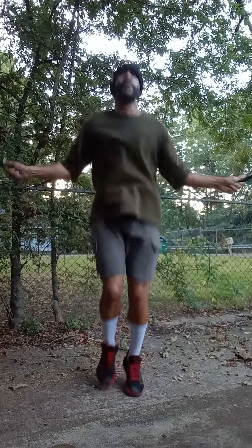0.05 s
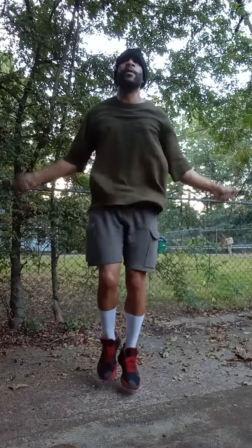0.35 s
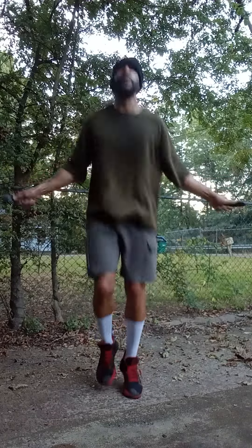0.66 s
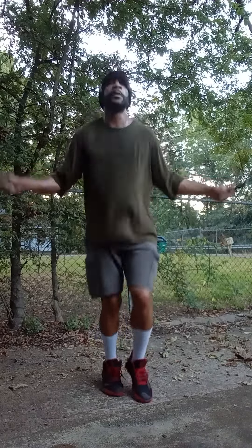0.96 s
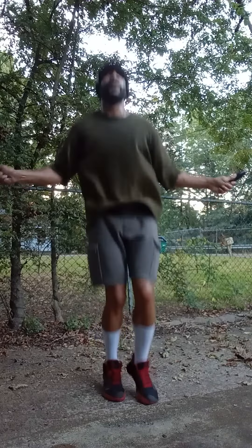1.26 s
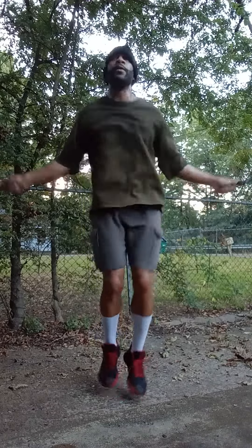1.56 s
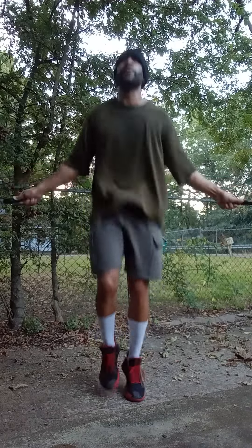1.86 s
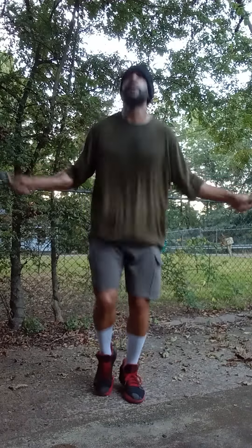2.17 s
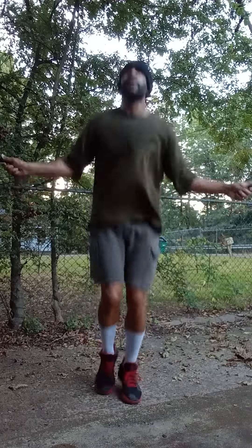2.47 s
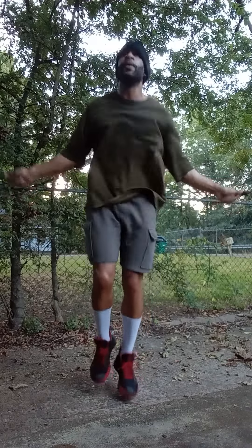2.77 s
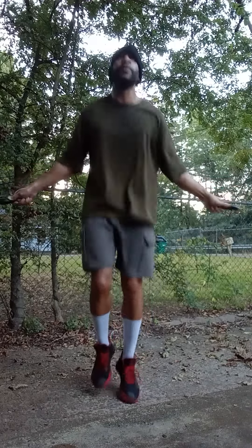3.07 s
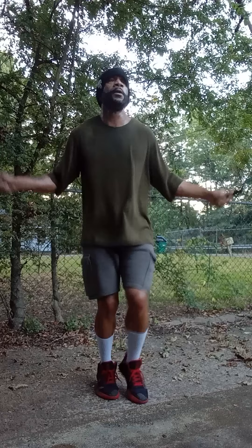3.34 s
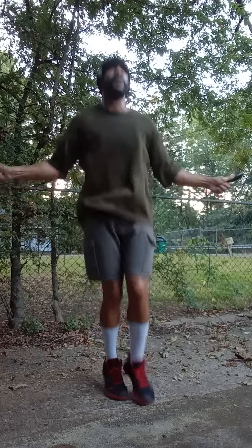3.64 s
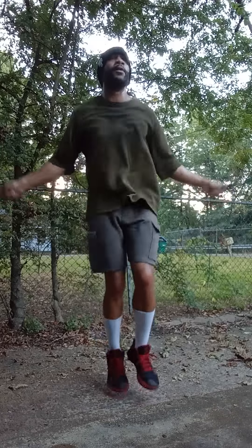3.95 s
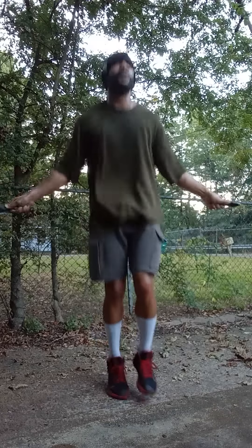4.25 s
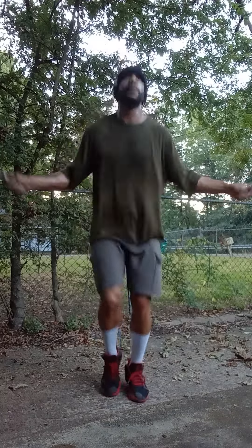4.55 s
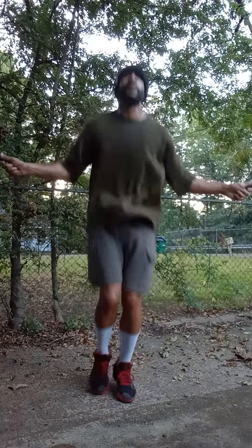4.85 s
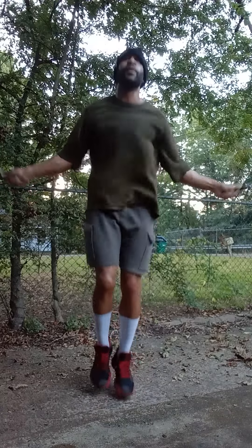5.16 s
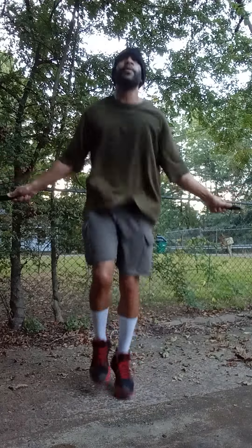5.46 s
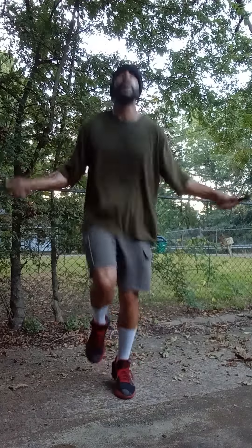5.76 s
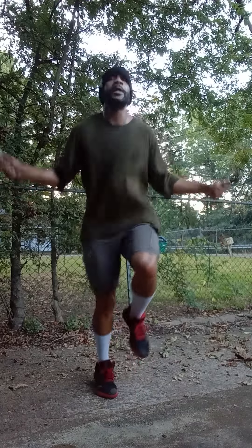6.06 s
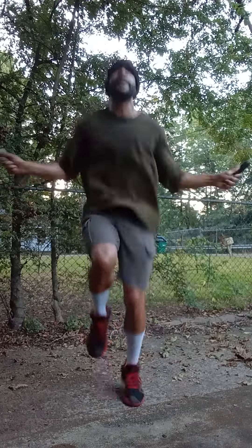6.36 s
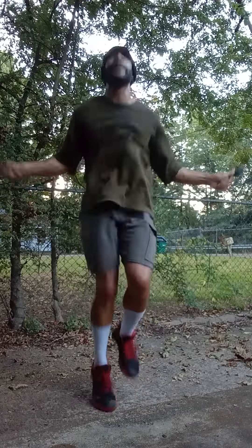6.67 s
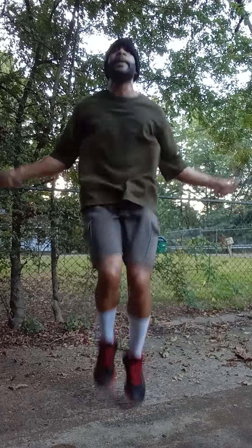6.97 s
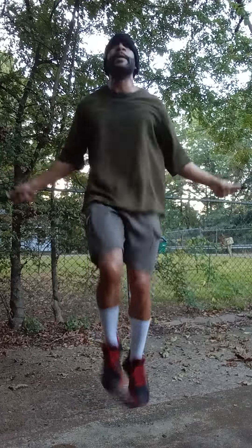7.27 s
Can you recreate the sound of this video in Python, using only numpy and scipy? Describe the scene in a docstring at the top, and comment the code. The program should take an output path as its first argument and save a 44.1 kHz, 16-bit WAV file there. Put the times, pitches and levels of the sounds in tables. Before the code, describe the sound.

A thin jump rope turns steadily on outdoor pavement, each pass giving a swish and a short whoop, then a sharp crack on the ground. Trainers land softly between the slaps, sometimes scuffing grit. Near the end the turns get faster and the whistling louder. A faint rumble and a few tiny, high bird chirps lie behind, and the rope sounds nearby, slightly to the right.

```python
"""Skipping rope among trees

Someone skips with a thin rope on a paved patch, speeding up for the last turns. The rope whistles by
vortex shedding, whoops each time it sweeps past, then cracks on the pavement. Trainers land softly
between the slaps, over a faint outdoor rumble and a few high bird chirps."""
import sys
import numpy as np
from scipy import signal
from scipy.fft import rfft, irfft, next_fast_len
from scipy.io import wavfile
from scipy.ndimage import uniform_filter1d

SR = 44100
rng = np.random.default_rng(int(sys.argv[2]) if len(sys.argv) > 2 else 0)


def generate_wav(signal):
    """Clip the signal to [-1, 1] and save it as 16-bit WAV at the path in sys.argv[1]."""
    frames = np.transpose(np.atleast_2d(signal))
    scaled = np.clip(frames, -1, 1) * 32767
    pcm = np.round(scaled).astype(np.int16)
    wavfile.write(sys.argv[1], SR, pcm)


N = 327222
T = np.arange(N) / SR
LEFT_LAG_S = 0.000125   # extra travel time to the left microphone

# One row per turn, timed as the rope sweeps past in front; the last two shape the whistle overhead:
# time_s, whoop_hz, whoop_db, whoop_width_s, swish_db, sag_hz, overhead_db
TURNS = [(-0.03, 800, -43, 0.017, -61, 60.4, -1), (0.368, 780, -33.5, 0.009, -53, 39.4, -6.5),
         (0.77, 838, -43.5, 0.0053, -51, 55.05, 3), (1.167, 839, -44, 0.01, -55, 70.1, 2),
         (1.561, 830, -36, 0.0094, -50.5, 50.2, -2.5), (1.955, 801, -37.5, .0094, -51, 45.15, -9),
         (2.356, 841, -36.5, 0.0085, -53, 59.8, -3.5), (2.758, 825, -43.5, .015, -52, 105.4, -2.5),
         (3.176, 793, -42.5, 0.0094, -51.5, 75.7, -2), (3.577, 838, -44.5, .016, -53.5, 54.16, 7),
         (3.965, 846, -41.5, 0.0083, -53.5, 35.17, -5.5), (4.356, 859, -33, 0.011, -48, 44.43, -7),
         (4.756, 804, -40, 0.015, -52, 39.53, 0.5), (5.151, 798, -45, 0.018, -52.5, 49.5, -6),
         (5.541, 816, -36, 0.01, -49, 61, -1), (5.925, 866, -40, 0.016, -45.5, 84.2, -2.5),
         (6.28, 961, -31, 0.0078, -42, 75.07, -2), (6.627, 878, -36, .014, -40, 115.1, -6),
         (6.978, 893, -39.5, 0.013, -41.5, 79.6, -2.5), (7.335, 883, -25, .0057, -40, 79.5, 6)]


def from_db(db):
    """Decibels to amplitude ratio."""
    return 10 ** (np.asarray(db) / 20)


def rms_one(x):
    """Normalisation to unit rms."""
    return x / np.sqrt(np.mean(np.abs(x) ** 2) + 1e-20)


def gains(points, size):
    """Magnitude response on the FFT grid, from rows of frequency_hz, gain_db."""
    hz, db = np.transpose(points)
    return from_db(np.interp(np.log(np.fft.rfftfreq(size, 1 / SR) + 1), np.log(hz), db))


def colour(x, points):
    """Zero-phase filtering gives a sound a spectrum."""
    size = next_fast_len(N)
    return irfft(rfft(x, size) * gains(points, size), size)[..., :N]


def noise(points, coherence, lag_s=0):
    """Partly coherent stereo noise with a given spectrum and a lag on the left; rms 1."""
    mid, side = rng.standard_normal((2, N))
    left, right = np.sqrt(1 + coherence) * mid + np.sqrt(1 - coherence) * side * [[1], [-1]]
    return rms_one(colour(np.array([np.roll(left, round(lag_s * SR)), right]), points))


def patchy(x, spread_db, size=1024):
    """Random modulation in time and frequency: a hiss flickers in short, narrow patches; rms 1."""
    cells = signal.stft(x, nperseg=size)[2]
    chance = uniform_filter1d(rng.standard_normal(cells.shape[1:]), size=4, axis=0)
    chance = rms_one(uniform_filter1d(chance, size=5, axis=1))
    return rms_one(signal.istft(cells * from_db(spread_db * chance), nperseg=size)[1][:, :N])


def strike(force, points, size=1024):
    """Convolution of contact forces with a causal (minimum-phase) impulse response of peak 1."""
    cepstrum = irfft(np.log(gains(points, size)))
    cepstrum[1:size // 2] *= 2
    cepstrum[size // 2 + 1:] = 0
    response = irfft(np.exp(rfft(cepstrum)))
    return signal.oaconvolve(force, response[None] / np.abs(response).max(), axes=1)[:, :N]


def flutter(width_hz):
    """Complex envelope of narrow-band noise: slowly varying amplitude and phase; rms 1."""
    white = rng.standard_normal(N + SR) + 1j * rng.standard_normal(N + SR)
    return rms_one(signal.sosfilt(signal.butter(2, width_hz, fs=SR, output="sos"), white)[SR:])


def narrow_band(pitch, width_hz, spread, left_lag_rad=0):
    """Narrow-band noise round a moving pitch; spread lowers the coherence of left and right; rms 1."""
    shared = flutter(width_hz)
    pair = np.array([shared * np.exp(-1j * lag) + spread * flutter(width_hz)
                     for lag in (left_lag_rad, 0)])
    return rms_one((pair * np.exp(2j * np.pi * np.cumsum(pitch) / SR)).real)


def later(x, delay_s):
    """Fractional delay by linear interpolation."""
    return np.interp(T - delay_s, T, x, left=0)


def from_right(x):
    """Path difference: direct sound reaches the left microphone a little later."""
    return np.array([np.roll(x, round(LEFT_LAG_S * SR)), x])


def clicks(times, db):
    """An impulse train, one impulse per event."""
    out = np.zeros(N)
    out[np.clip(np.round(times * SR).astype(int), 0, N - 1)] = from_db(db)
    return out


def dying(hits, t60_s):
    """Exponential decay: an envelope that jumps at each impulse and falls 60 dB in t60_s."""
    return signal.lfilter([1], [1, -from_db(-60 / (t60_s * SR))], hits + 1e-18)


def swells(times, db, widths):
    """A sum of Gaussian envelopes, one per event; widths are standard deviations in seconds."""
    return sum(from_db(peak) * np.exp(-.5 * np.minimum(((T - centre) / width) ** 2, 100))
               for centre, peak, width in zip(times, db, widths))


def nearest_event(times):
    """For each sample, the row of the closest event."""
    return np.searchsorted((times[1:] + times[:-1]) / 2, T)


def outdoors():
    """Ambient noise: a coherent distant rumble under a diffuse hiss of air and leaves."""
    # Spectra of the rumble and of the hiss: frequency_hz, density_db
    rumble_spectrum = [(15, -54.5), (25, -36.5), (42, -30), (62, -6.5), (80, -5), (100, 0.5), (130, 1.5),
                       (170, -7), (300, -11.5), (600, -16.5), (1500, -25), (5000, -84.5)]
    air_spectrum = [(15, -49), (25, 0.5), (108, -13.5), (270, -17.5), (575, -19.5), (677, -6), (775, -8.5),
                    (1040, -11), (1560, -12), (2610, -21), (5730, -24.5), (8360, -37.5), (13600, -44.5),
                    (14800, -31.5), (16000, -45)]
    # Slow drift of the rumble: time_s, level_db
    rumble_level = [(0.0, -60.5), (1.25, -59), (1.8, -60.5), (3.6, -59.5), (4.1, -61), (6.7, -60.5),
                    (7.42, -59)]
    drift = from_db(np.interp(T, *np.transpose(rumble_level)))
    rumble = drift * patchy(noise(rumble_spectrum, coherence=1.0), spread_db=3.5, size=2048)
    leaves = patchy(noise(air_spectrum, coherence=0.097), spread_db=5.0)
    return rumble + from_db(-67.0) * colour(leaves, [(20, -12), (120, 0.5)])


def bird():
    """Thin falling notes, blurred by scattering in the leaves and followed by one echo."""
    # Notes of a small bird: time_s, start_hz, end_hz, level_db, width_s
    chirps = [(3.006, 7900, 6970, -71.5, 0.016), (3.142, 7000, 6200, -69, 0.016),
              (5.336, 7900, 6920, -73.5, 0.037), (5.458, 7200, 6170, -63, 0.016)]
    time_s, start_hz, end_hz, level_db, width_s = np.transpose(chirps)
    row = nearest_event(time_s)
    fallen = np.clip((T - time_s[row]) / width_s[row] / 2 + 0.81, 0, 1)
    pitch = start_hz[row] + fallen * (end_hz - start_hz)[row]
    notes = swells(time_s, level_db, width_s) * narrow_band(pitch, width_hz=170, spread=1.0)
    return notes + from_db(-4.5) * np.array([later(x, 0.024) for x in notes[::-1]])


def shoes():
    """Impact and friction: rubber soles tap and roll down, the weight thuds, and grit scuffs."""
    # Landings: start_s, tap_db, thud_db, hardness_db
    steps = [(0.178, -67, -55.5, 1), (0.469, -48.5, -67, 0), (0.9305, -47.5, -60, 8.5),
             (0.983, -43.5, -57, -3), (1.3274, -38, -53, 8), (1.356, -43.5, -50, 3), (1.49, -48, -84, -4),
             (1.756, -74, -63, -12), (2.146, -48, -62, -32.5), (2.58, -75, -62, -10), (2.917, -50, -64, -5),
             (2.965, -65, -60, -11), (3.316, -53, -70, -1), (3.365, -46, -53, -25), (3.7498, -46, -54.5, 7),
             (4.111, -49, -69, 5.5), (4.151, -59, -53, -18), (4.552, -45, -66, -15), (4.932, -81, -59, -16),
             (5.289, -48.5, -59, -15), (6.062, -54, -55.5, -4), (6.752, -66, -68, -10),
             (7.102, -48, -65, 2)]
    # Soles sliding on grit: time_s, level_db, width_s
    scuffs = [(0.995, -60, 0.025), (2.178, -61.5, 0.031), (2.622, -61.5, 0.014), (3.375, -59.5, 0.037),
              (3.76, -64.5, 0.013), (4.153, -75, 0.0068), (4.585, -60, 0.037), (5.77, -60, 0.036),
              (6.533, -46.5, 0.002), (6.543, -43, 0.0023), (6.557, -49, 0.0086), (6.763, -62, 0.036),
              (6.865, -58.5, 0.046)]
    # Spectra of the sole's tap and of the weight's thud: frequency_hz, density_db
    tap_spectrum = [(150, -16), (450, 3.5), (650, 6), (900, 1.5), (1250, 8), (1600, 9), (2100, -13),
                    (5000, -12.5), (12000, -50)]
    thud_spectrum = [(40, -20), (110, -1), (280, 5.5), (450, 1), (650, -9), (1000, -50), (4000, -62)]
    start_s, tap_db, thud_db, hardness_db = np.transpose(steps)
    knock = strike(from_right(clicks(start_s, tap_db + hardness_db)), tap_spectrum)
    contact_s = 0.01 * from_db(-.65 * hardness_db)   # a softer contact lasts longer
    rolling = swells(start_s + 0.011, tap_db - 10.5 + 0.25 * hardness_db, contact_s)
    roll = rolling * noise(tap_spectrum, coherence=0.47)
    weight = uniform_filter1d(dying(clicks(start_s + 0.0045, thud_db), t60_s=0.14), size=660)
    thud = from_db(5.5) * weight * noise(thud_spectrum, coherence=0.99)
    grit_spectrum = [(500, -4), (1600, 7.5), (3000, 8), (6500, -1.0), (8500, -24.5), (16000, -25)]
    grit = patchy(noise(grit_spectrum, coherence=0.11), spread_db=6.0)
    return knock + roll + thud + swells(*np.transpose(scuffs)) * grit


def swing():
    """The whistle's pitch (Hz) and level (dB) follow rope speed, which sags overhead in every turn."""
    # The skipper's pace, steady and then faster: time_s, pitch_hz, level_db
    pace = [(0.0, 810, -55.5), (5.7, 813.6, -59), (5.97, 921, -43), (7.42, 914.5, -43)]
    # The whistle round one turn, dipping after the slap: turn_fraction, gain_db
    turn_loudness = [(0.03, 6.5), (0.15, 1), (0.25, -8.5), (0.41, 3), (0.7, -1), (0.85, -5.5)]
    time_s, *_, sag_hz, overhead_db = np.transpose(TURNS)
    starts = np.append(time_s, 2 * time_s[-1] - time_s[-2])
    turned = np.interp(T, starts, np.arange(len(starts)))
    row, fraction = turned.astype(int), turned % 1
    overhead = np.exp(-.5 * ((fraction - .68) / .15) ** 2)   # slowest 68% of the way round
    pace_s, pace_hz, pace_db = np.transpose(pace)
    pitch = np.interp(T, pace_s, pace_hz) - sag_hz[row] * overhead
    turn_db = np.interp(fraction, *np.transpose(turn_loudness), period=1)
    return pitch, np.interp(T, pace_s, pace_db) + turn_db + overhead_db[row] * overhead


def rush(pitch, level_db):
    """Turbulence round the rope: a rising swish as it comes over, and a hiss that grows with speed."""
    # Spectrum of the turbulent hiss: frequency_hz, density_db
    hiss_spectrum = [(300, -22), (600, -12.5), (1150, 4.5), (1700, 7), (2200, -5), (2700, 1), (3300, -3),
                     (6800, -9.5), (8500, -24.5), (13000, -25.5), (15000, -15.5), (16500, -34)]
    time_s, whoop_hz, _, width_s, swish_db, *_ = np.transpose(TURNS)
    row = nearest_event(time_s)
    swish_s = time_s - 0.034   # the swish peaks ahead of the whoop
    rising_hz = whoop_hz[row] * (2.25 + 0.67 * np.tanh((T - swish_s[row] - .005) / 0.0503))
    peak_db = swish_db - 14.5 + 0.64 * (swish_db + 50.0)
    band = narrow_band(rising_hz, width_hz=160, spread=0.73, left_lag_rad=2.4)
    swish = swells(swish_s, peak_db, width_s + 0.021) * band
    passing = swells(time_s - .005, swish_db - 6.5, width_s + 0.013)
    turning = from_db(level_db - 22 + 27 * np.log10(pitch / 850))
    hiss = patchy(noise(hiss_spectrum, coherence=0.14, lag_s=LEFT_LAG_S), spread_db=5.5)
    return swish + np.hypot(passing, turning) * hiss


def whistle(pitch, level_db):
    """Aeolian tone: vortex shedding at a rate set by speed, with a weaker drag tone an octave up."""
    lift = narrow_band(pitch, width_hz=35.7, spread=0.58, left_lag_rad=0.17)
    drag = from_db(-22) * narrow_band(2 * pitch, width_hz=86, spread=0.41, left_lag_rad=2.06)
    flapping = rms_one(from_db(3.5 * flutter(22).real))
    return from_db(level_db) * flapping * (lift + drag)


def whoops():
    """Superposition: the passing rope's whole arc sounds together in a burst with a third harmonic."""
    time_s, whoop_hz, whoop_db, width_s, *_ = np.transpose(TURNS)
    row = nearest_event(time_s)
    pitch = whoop_hz[row] - 45 * np.tanh((T - time_s[row]) / 0.03)   # falls as the rope goes by
    phase = 2 * np.pi * np.cumsum(pitch) / SR
    rough = np.clip(width_s[row] / 0.018, 0, 1)   # slow sweeps are the ragged ones
    waver = np.sqrt(1 - rough ** 2) + rough * flutter(46.7)
    burst = swells(time_s, whoop_db, width_s)
    tone = burst * (waver * np.exp(1j * phase)).real
    direct = from_db([[6], [7.5]]) * np.array([later(tone, .00003), tone])   # louder on the right
    echo_s = .0125 + rng.uniform(0, 0.00232, 2)   # reflection from nearby trunks
    echo = from_db(-5) * np.array([later(tone, delay) for delay in echo_s])
    third = narrow_band(3 * pitch, width_hz=120, spread=.6, left_lag_rad=1.2)
    return direct + echo + from_db(-25) * (pitch / 850) ** 6 * burst * third


def slaps():
    """Impact and reverberation: the rope cracks and lies down on grit; fence and trees scatter it."""
    # The rope hits the pavement: start_s, level_db, extra_body_db, extra_top_db
    impacts = [(0.0372, -22, -4, 0), (0.8374, -26, -1, 0), (1.2322, -22, 1, -2), (1.6384, -30, -9, -3),
               (2.0304, -30, 0, 5), (2.4267, -22, -2, -1), (2.8287, -22, -2, 0), (3.2398, -23, -2, 0),
               (3.6395, -31, 0, 3), (4.0345, -28, 2, 0), (4.4222, -22, -1, 0), (4.8237, -25, 3, 1),
               (5.2193, -22, -1, -5), (5.6086, -22, 2, 0), (5.9972, -25, 1, -3), (6.3446, -26, 4, 4),
               (6.6902, -20, 0, 0), (7.0504, -20, 0, -2), (7.406, -38, 7, 2)]
    # Spectra of the direct crack and of its scattered tail: frequency_hz, density_db
    crack_spectrum = [(300, -23), (1200, -17), (2400, -3), (3500, -5), (4400, 1.5), (6300, 1.5), (8500, -9),
                      (10000, -4.5), (13000, -8.5), (14800, -1), (16000, -11.5)]
    tail_spectrum = [(400, -30), (1300, -10.5), (2400, -6.5), (4400, 0.5), (6700, 3), (8300, -7.5),
                     (13000, -6.5), (14800, -1), (15500, 3.5), (16000, -48)]
    start_s, level_db, extra_body_db, extra_top_db = np.transpose(impacts)
    hits = clicks(start_s, level_db)
    grains = rng.standard_normal((3, N)) * (rng.random((3, N)) < .25)   # separate touches on the grit
    grit = from_right(grains[0]) + 0.63 * grains[1:]
    laying = from_db(-8) * dying(later(hits, 9 / SR), t60_s=.022) * grit
    crack = from_db(0.5) * strike(from_right(hits) + laying, crack_spectrum)
    near = from_db(-23.0) * dying(hits, t60_s=0.22)
    far = from_db(-19.5) * dying(later(hits, 0.011), t60_s=0.19)
    lumps = from_db(0.43 * flutter(160).real)   # separate reflections make the tail uneven
    scatter = patchy(noise(tail_spectrum, coherence=0.084), spread_db=2.5)
    sound = crack + np.hypot(near, far) * lumps * scatter
    # Each slap has its own balance of body and top; air absorbs the top of late reflections.
    row = np.maximum(np.searchsorted(start_s - .05, T) - 1, 0)
    body = colour(sound, [(3000, 1.5), (4100, -6.5), (6000, -69)])
    top = colour(sound, [(6000, -61.5), (7400, -12), (8400, -2.0)])
    body_gain = from_db(extra_body_db[row] + 1.55)
    top_gain = from_db(extra_top_db[row] - 1000 * (T - start_s[row]) ** 2)
    return sound + (body_gain - 1) * body + (top_gain - 1) * top


def scene():
    """All sources add at a microphone pair whose level difference depends on frequency."""
    # Balance of the pair: frequency_hz, left_minus_right_db
    balance = [(250, 0), (550, -1.5), (850, -4.5), (1400, -3), (2300, -1), (4000, -5.5), (7000, -5),
               (14000, 1.5)]
    pitch, level_db = swing()
    rope = whistle(pitch, level_db) + whoops() + rush(pitch, level_db) + slaps()
    sound = rope + shoes() + bird() + outdoors()
    return np.array([colour(channel, [(hz, side * db / 2) for hz, db in balance])
                     for channel, side in zip(sound, (1, -1))])


def record(dry):
    """Band limiting: an elliptic low-pass filter cuts the top steeply."""
    cutoff_hz = 16300
    return signal.sosfilt(signal.ellip(10, .1, 70, cutoff_hz, fs=SR, output="sos"), dry)


dry = scene()
out = record(dry)
generate_wav(out)
```